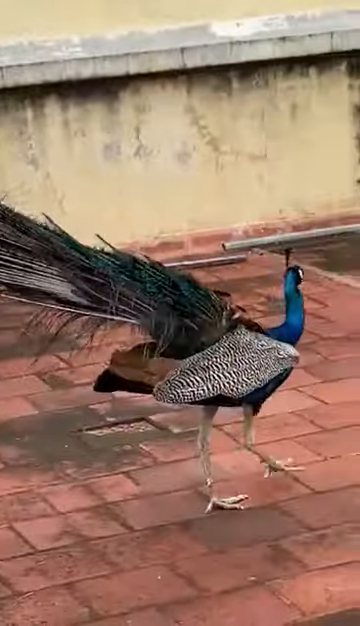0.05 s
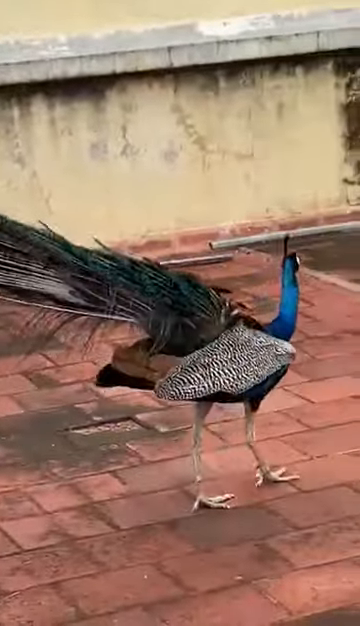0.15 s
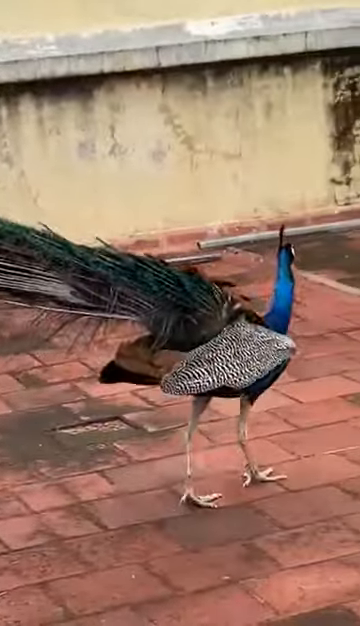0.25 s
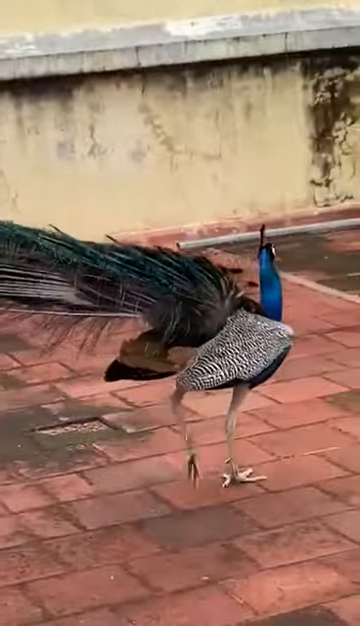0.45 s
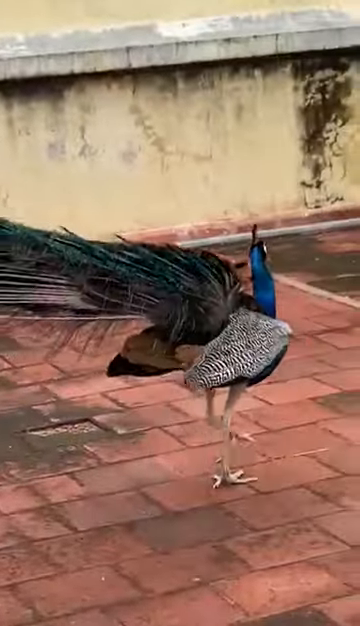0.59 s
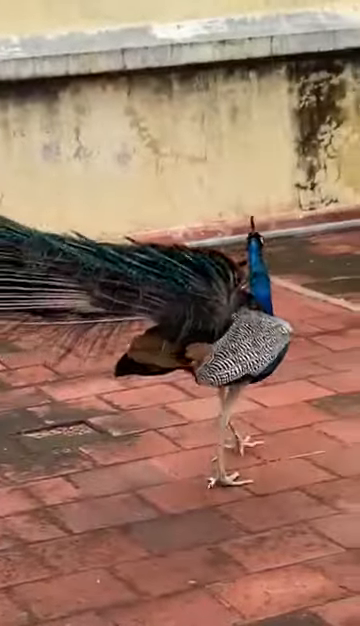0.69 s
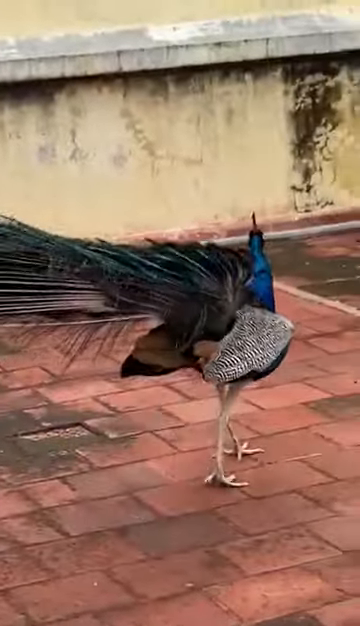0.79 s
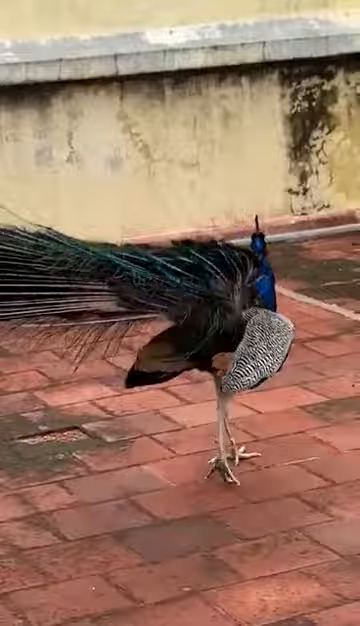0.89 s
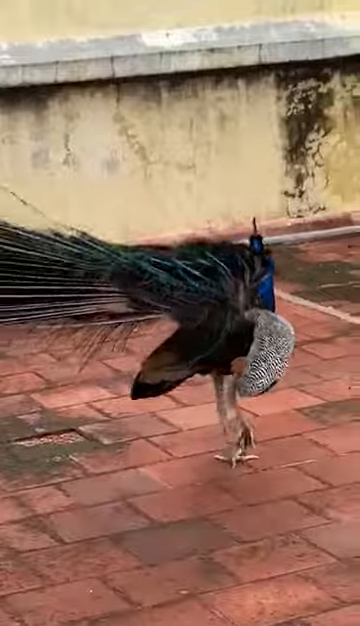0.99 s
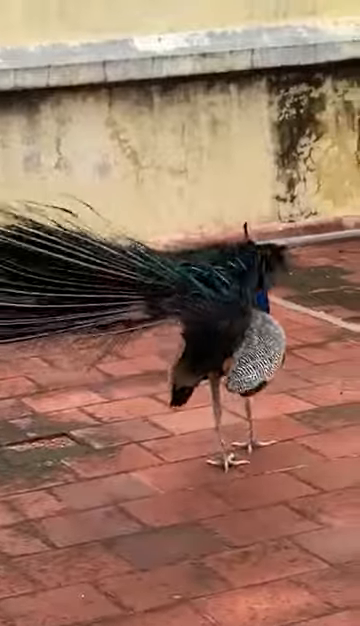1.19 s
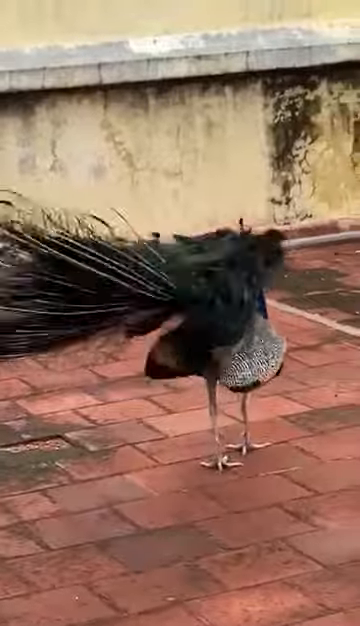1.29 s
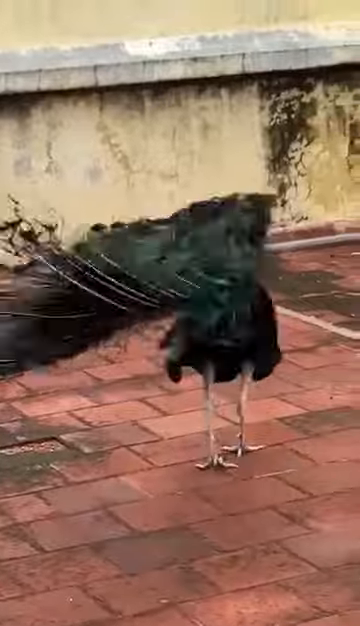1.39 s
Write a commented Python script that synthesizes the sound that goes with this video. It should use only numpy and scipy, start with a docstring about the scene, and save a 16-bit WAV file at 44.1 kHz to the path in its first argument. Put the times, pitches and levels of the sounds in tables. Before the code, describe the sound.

Low wind buffeting hits the microphone in irregular soft thuds and bumps, building from about 0.1 seconds, heaviest near 0.6, and easing after 0.9. Beneath lies faint, steady outdoor hiss, with very quiet, short, high bird notes scattered until about 1.2 seconds. As the rumble dies away, a peacock starts shaking its train: a faint, dense, dry quill rattle and feathery swish, growing from 1.2 to the cut-off near 1.45.

```python
"""Gusty wind buffets a phone microphone on a tiled roof terrace, over a faint steady outdoor hiss.
Pressure jumps, steps through a steep low cut, thud hardest around 0.6 s on a bed of small random eddies.
A few far bird notes, short gliding sines, come between 0 and 1.2 s.
From about 1.2 s a peacock starts to shake its train: dense random ticks mixed with coloured noise."""
import sys
import numpy as np
from scipy import signal
from scipy.fft import rfft, irfft, next_fast_len
from scipy.io import wavfile
from scipy.ndimage import uniform_filter1d

SR = 44100
rng = np.random.default_rng(int(sys.argv[2]) if len(sys.argv) > 2 else 0)


def put_to_file(sound):
    """Save the sound as 16-bit audio at rate SR, in the file named by the first command-line argument."""
    columns = np.atleast_2d(sound).T  # one column per channel
    safe = np.clip(columns, -1, 1)
    whole_steps = np.round(safe * 32767)
    wavfile.write(sys.argv[1], SR, whole_steps.astype(np.int16))


N = 63945

# Larger pressure jumps: (time [s], peak in the ports' mid [dB], rise time constant [ms], push +1 or pull -1)
PRESSURE_JUMPS = [(0.0593, -44.5, 1.5, 1), (0.098, -42.5, 1.8, 1), (0.126, -42.5, 4, 1),
                  (0.1387, -34, 4.5, -1), (0.1716, -33.5, 11, -1), (0.1972, -31, 13, 1),
                  (0.228, -33, 8.7, -1), (0.2555, -38, 6.1, -1), (0.2773, -32.5, 1.3, -1),
                  (0.322, -30.5, 0.26, 1), (0.3291, -23.5, 3.4, -1), (0.361, -25.5, 0.092, 1),
                  (0.3655, -21, 0.82, -1), (0.398, -31, 2.8, -1), (0.4129, -23, 1.26, 1),
                  (0.4556, -27.7, 7.1, 1), (0.4853, -33.5, 1.3, -1), (0.512, -33.5, 6.4, 1),
                  (0.5191, -21.5, 1.98, 1), (0.5254, -28.5, 0.2, 1), (0.5576, -28, 4.2, -1),
                  (0.5996, -14, 5.2, 1), (0.628, -33.5, 0.1, -1), (0.6297, -24, 6.8, 1),
                  (0.652, -46.5, 0.14, 1), (0.6537, -29, 9.1, 1), (0.6803, -21.5, 0.65, 1),
                  (0.6896, -27, 4.5, -1), (0.7144, -31, 6, -1), (0.7237, -33.5, 0.77, -1),
                  (0.7293, -25, 0.57, -1), (0.769, -36, 0.39, 1), (0.8076, -35, 0.93, 1),
                  (0.8132, -37.3, 0.37, 1), (0.8408, -28, 0.31, -1), (0.8453, -42.5, 0.23, 1),
                  (0.854, -34.5, 0.13, -1), (0.8612, -33.5, 2.6, -1), (0.924, -43, 0.62, 1),
                  (0.9509, -29, 0.13, 1), (1.013, -42.5, 4.6, -1), (1.034, -43, 3.2, -1),
                  (1.0474, -40, 3.7, 1), (1.0946, -42, 0.88, -1), (1.1338, -39, 0.98, -1),
                  (1.161, -49, 4.4, -1), (1.426, -54.5, 1.6, 1)]
# Small eddies between jumps, before EDDY_TRIM_DB: (time [s], level [dB])
EDDY_LEVELS = [(0.0, -33), (0.028, -45), (0.298, -41.5), (0.374, -37), (0.476, -41.5), (0.532, -35),
               (0.56, -40), (0.604, -32), (0.662, -35), (0.686, -33), (0.802, -41), (0.848, -39.5),
               (0.908, -42.5), (0.96, -40), (0.996, -45.5), (1.146, -48), (1.186, -58), (1.45, -59)]
# Wind, gain of the left-right difference: (frequency [Hz], gain [dB])
WIND_SIDE_GAIN = [(40, -28.5), (70, -28), (120, -23.5), (250, -16.5), (400, -24)]
# Outdoor hiss, relative colour of the ports' sum: (frequency [Hz], density [dB per Hz])
AIR_SUM_COLOUR = [(40, -13), (70, -1), (95, 6.5), (150, -5), (300, -0.5), (500, -8), (720, -12),
                  (1180, -13), (2200, -19.5), (2730, -16), (3010, -15.5), (3300, -19.5), (3630, -23),
                  (5970, -22), (6350, -33), (6650, -67), (8000, -59), (8300, -34.5), (9010, -27.5),
                  (10800, -25.5), (11500, -29), (11850, -40), (12100, -45)]
# Outdoor hiss, relative colour of the ports' difference: (frequency [Hz], density [dB per Hz])
AIR_DIFF_COLOUR = [(100, -27.5), (400, -12.5), (1590, -21.5), (2140, -41), (2500, -30.5), (3050, -42),
                   (3300, -60.5), (3900, -73.5), (4250, -47), (4700, -42), (4900, -64), (5350, -60),
                   (5600, -25), (8800, -26), (9700, -41), (12100, -46)]
# Far bird notes, level before flutter and lean:
# (time [s], length [s], start frequency [Hz], end frequency [Hz], level [dB])
BIRD_NOTES = [(.005, 0.048, 2950, 2950, -72.5), (0.504, 0.033, 3040, 3020, -71),
              (0.533, 0.023, 3080, 3104, -65.5), (0.716, 0.041, 2990, 2943, -69),
              (0.882, .036, 3013, 3060, -61), (0.996, 0.14, 2902, 2907, -74.5),
              (1.142, 0.039, 4260, 4210, -72.5)]
# Quills rattling: (time [s], level [dB])
SHAKE_LEVELS = [(1.16, -82.5), (1.23, -66.5), (1.26, -65.5), (1.295, -55.5), (1.31, -61), (1.331, -53),
                (1.352, -54.5), (1.363, -53), (1.39, -58), (1.41, -55.5), (1.421, -54.5), (1.435, -58),
                (1.45, -51)]
# Quills, relative colour of the ports' sum: (frequency [Hz], density [dB per Hz])
QUILL_SUM_COLOUR = [(300, -28), (600, -16), (1000, -2.5), (1570, -1), (1910, -6), (2370, -0.5),
                    (5640, -2.5), (6230, -6), (6600, -21.5), (8000, -49.5), (8500, -9.5), (9540, -1.5),
                    (11200, -2), (12100, -28)]
# Quills, relative colour of the ports' difference: (frequency [Hz], density [dB per Hz])
QUILL_DIFF_COLOUR = [(300, -38), (1000, -16.5), (1800, -20), (2300, -40), (3200, -48.5), (5300, -42.5),
                     (5700, -4.5), (7300, -0.5), (9000, -3.5), (9800, -27.5), (12100, -39)]

LOW_CUT_HZ, JUMP_TOP_HZ = 57.6, 346
THUD_SIDE = 0.99  # scale of each jump's random lean, ahead of WIND_SIDE_GAIN
EDDY_RATE_PER_S, EDDY_SPREAD_DB, EDDY_RISE_MS, EDDY_TRIM_DB = 500, 2, 0.64, -7
AIR_DB, AIR_PATCH_DB = -56.5, 1.06
NOTE_EDGE_S, NOTE_FLUTTER_DB, NOTE_LEAN_DB = 0.006, 3.2, 0.8
TICK_RATE_PER_S, TICK_SPREAD_DB, TICK_POWER_SHARE = 1500, 2.5, 0.52
TOP_HZ = 12150


def amp(db):
    """Decibels to gain."""
    return 10 ** (np.asarray(db) / 20)


def unit(x):
    """Scale to rms 1."""
    return x / np.sqrt(np.mean(x ** 2) + 1e-20)


def along(points, hz):
    """Interpolate (frequency, value) points on a log frequency axis."""
    point_hz, value = np.transpose(points)
    return np.interp(np.log(hz + 1), np.log(point_hz + 1), value)


def curve(rows):
    """Interpolate (time, value) rows to one value per sample."""
    time_s, value = np.transpose(rows)
    return np.interp(np.arange(N) / SR, time_s, value)


def filtered(x, response):
    """Apply a complex frequency response, zero-padded by half a second or more."""
    size = next_fast_len(N + SR // 2)
    spectrum = rfft(x, size) * response(np.fft.rfftfreq(size, 1 / SR))
    return irfft(spectrum, size)[..., :N]


def ticks(rate_per_s, spread_db):
    """Two trains of random clicks of either sign, a few much larger than the rest."""
    chance, sign, size = rng.random((3, 2, N))
    on = chance < rate_per_s / SR
    size_gain = amp(-spread_db * np.log(size + 1e-4))
    return unit(on * np.sign(sign - 0.5) * size_gain)


def ports(pair, sum_colour, diff_colour):
    """Colour two sources as sum and difference; return left and right at joint rms 1."""
    mid, side = filtered(pair, lambda hz: amp([along(sum_colour, hz), along(diff_colour, hz)]))
    return unit(np.array([mid + side, mid - side]))


def flat4(s):
    """Fourth-order maximally flat low-pass at relative complex frequency s."""
    first_pair = s * s + 2 * np.cos(np.pi / 8) * s + 1
    second_pair = s * s + 2 * np.cos(3 * np.pi / 8) * s + 1
    return 1 / first_pair / second_pair


def jump(rise_ms):
    """Response of a smoothed pressure step after an eighth-order low cut: it rings downward in pitch."""
    def response(hz):
        s = 1j * hz / LOW_CUT_HZ + 1e-9  # offset avoids division by zero
        low_cut = flat4(1 / s) ** 2
        soft_top = flat4(1j * hz / JUMP_TOP_HZ)
        rise = 1 / (1 + 2j * np.pi * hz * rise_ms / 1000) ** 3
        return low_cut * soft_top * rise / s  # 1/s makes the step
    return response


def wind():
    """Large pressure jumps on a bed of small random ones, almost alike at both ports."""
    thuds = np.zeros((2, N))  # mid, side source
    click = np.arange(N) == 0
    leans = rng.standard_normal(len(PRESSURE_JUMPS))
    for (time_s, peak_db, rise_ms, sign), lean in zip(PRESSURE_JUMPS, leans):
        start = round(time_s * SR)
        step = filtered(click, jump(rise_ms))
        thud = np.sign(sign) * amp(peak_db) * step[:N - start] / abs(step).max()
        thuds[:, start:] += thud * [[1], [THUD_SIDE * lean]]

    small_jumps = filtered(ticks(EDDY_RATE_PER_S, EDDY_SPREAD_DB), jump(EDDY_RISE_MS))
    eddies = np.array([unit(e) for e in small_jumps])
    mid, side_source = amp(curve(EDDY_LEVELS) + EDDY_TRIM_DB) * eddies + thuds
    side = filtered(side_source, lambda hz: amp(along(WIND_SIDE_GAIN, hz)))
    return np.array([mid + side, mid - side])


def air():
    """Steady far hiss: coloured noise with slight level patches in time and frequency."""
    noise = signal.stft(rng.standard_normal((2, N)), nperseg=512)[2]
    patches = uniform_filter1d(rng.standard_normal(noise.shape), size=5, axis=1)  # bins
    patches = uniform_filter1d(patches, size=8, axis=2)  # frames
    pair = signal.istft(noise * amp(AIR_PATCH_DB * unit(patches)), nperseg=512)[1][:, :N]
    return amp(AIR_DB) * ports(pair, AIR_SUM_COLOUR, AIR_DIFF_COLOUR)


def birds():
    """Short whistled notes: gliding sines, unsteady in level, a little to the left."""
    t, notes = np.arange(N) / SR, np.zeros(N)
    for start_s, length_s, start_hz, end_hz, level_db in BIRD_NOTES:
        end_s = start_s + length_s
        hz = np.interp(t, [start_s, end_s], [start_hz, end_hz])
        edge = np.clip(np.minimum(t - start_s, end_s - t) / NOTE_EDGE_S + 0.5, 0, 1) ** 2
        flutter_db = NOTE_FLUTTER_DB * unit(uniform_filter1d(rng.standard_normal(N), size=300))
        tone = np.sqrt(2) * np.sin(2 * np.pi * np.cumsum(hz) / SR)  # rms 1
        notes += amp(level_db) * edge * amp(flutter_db) * tone
    return notes * amp([[NOTE_LEAN_DB], [-NOTE_LEAN_DB]])


def train():
    """Peacock train: dense quill ticks in a feathery swish of noise."""
    rattle = np.sqrt(TICK_POWER_SHARE) * ticks(TICK_RATE_PER_S, TICK_SPREAD_DB)
    swish = np.sqrt(1 - TICK_POWER_SHARE) * rng.standard_normal((2, N))
    return amp(curve(SHAKE_LEVELS)) * ports(rattle + swish, QUILL_SUM_COLOUR, QUILL_DIFF_COLOUR)


def scene():
    """Sum all sources at the two ports."""
    return wind() + air() + birds() + train()


def record(dry):
    """The phone keeps nothing above its band limit."""
    return filtered(dry, lambda hz: hz < TOP_HZ)


dry = scene()
out = record(dry)
put_to_file(out)
```